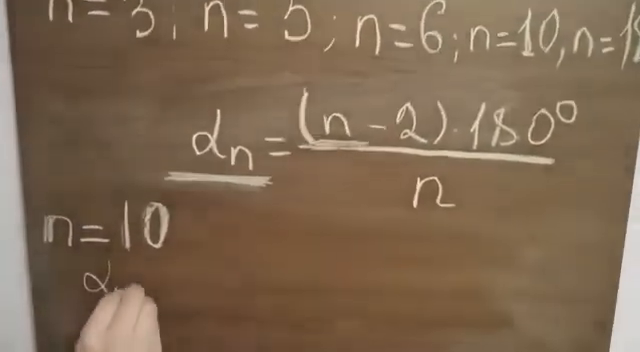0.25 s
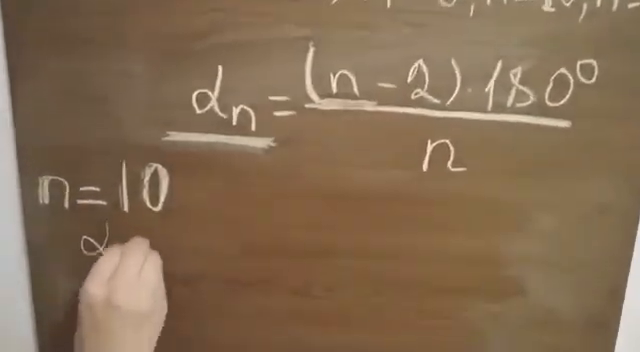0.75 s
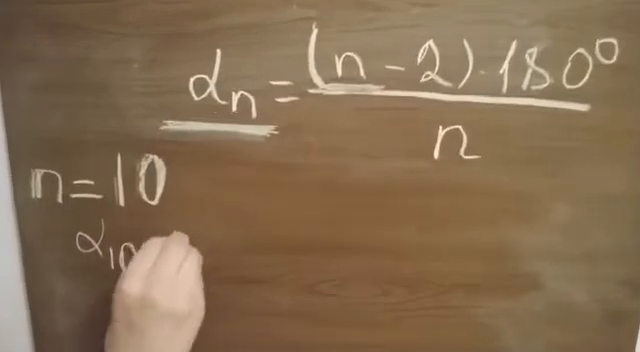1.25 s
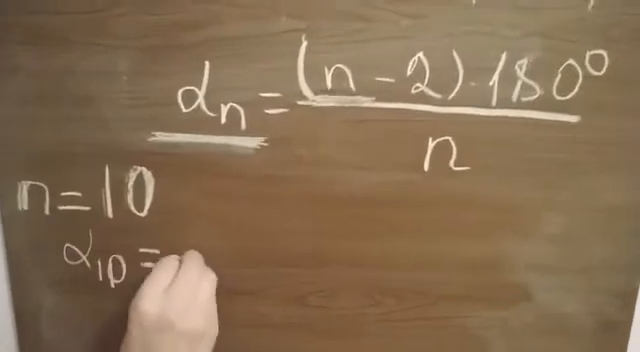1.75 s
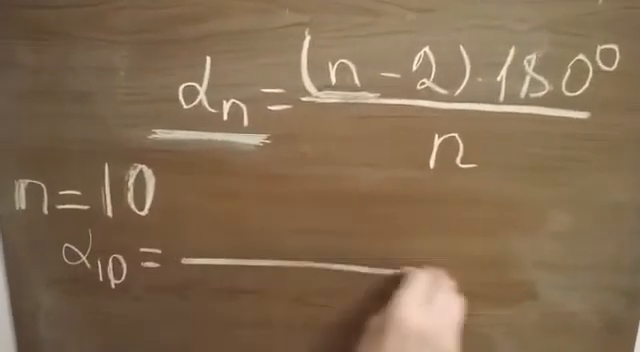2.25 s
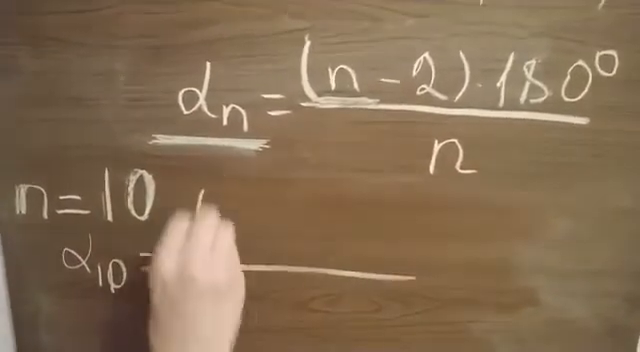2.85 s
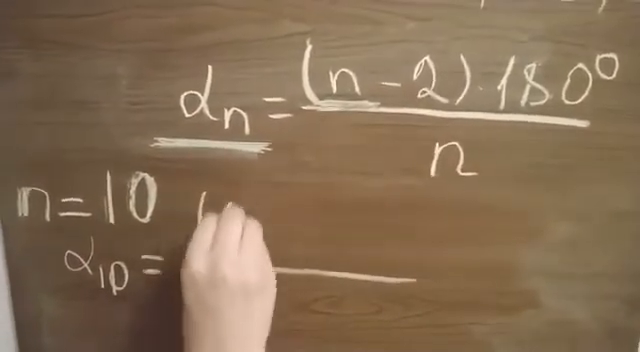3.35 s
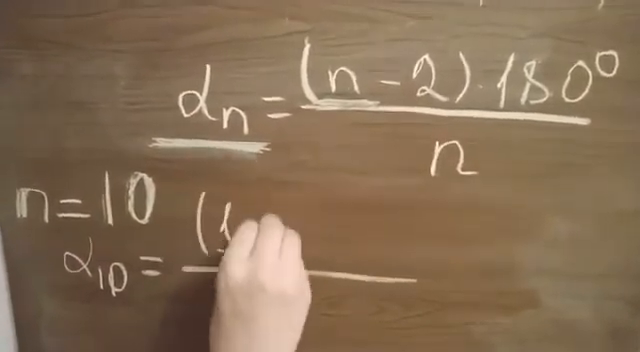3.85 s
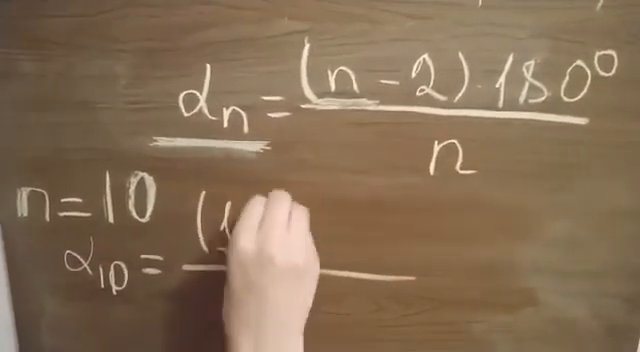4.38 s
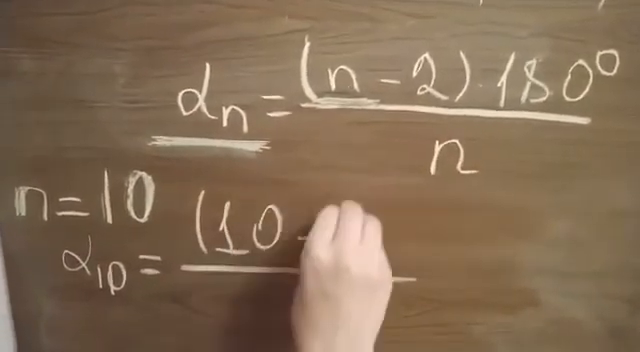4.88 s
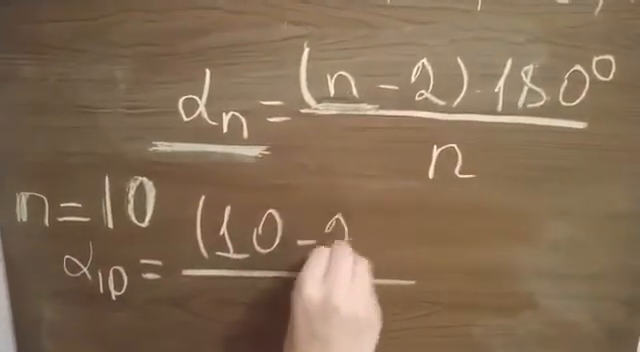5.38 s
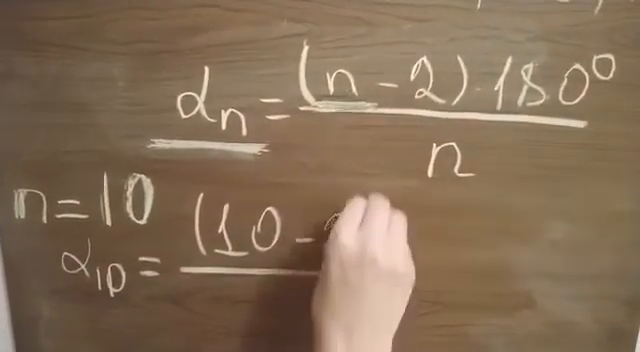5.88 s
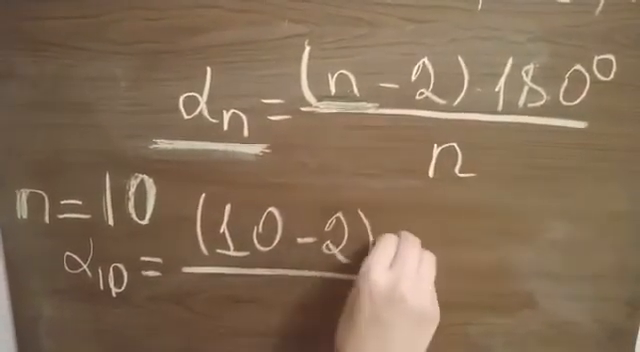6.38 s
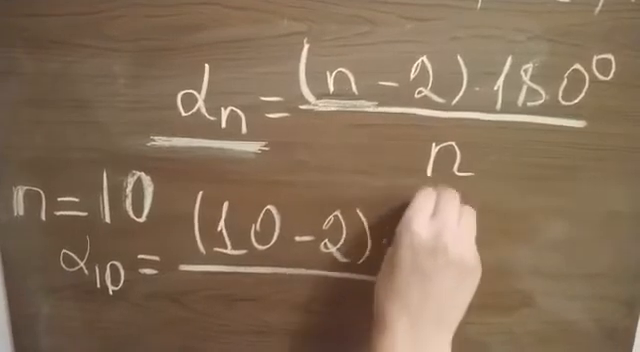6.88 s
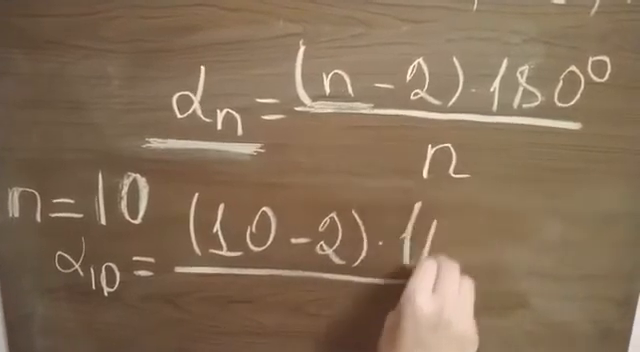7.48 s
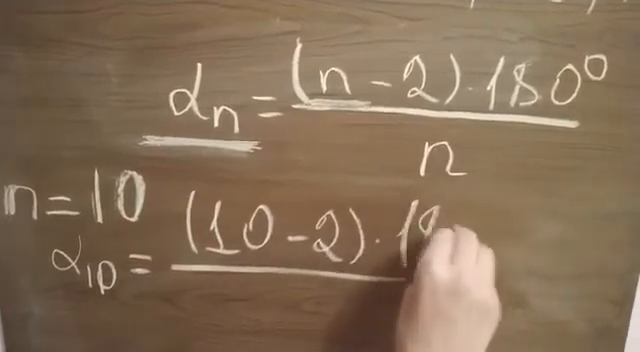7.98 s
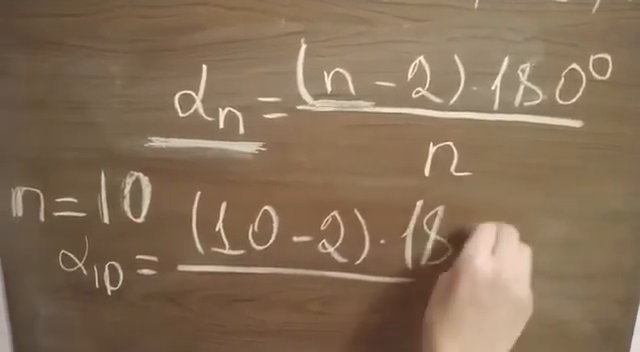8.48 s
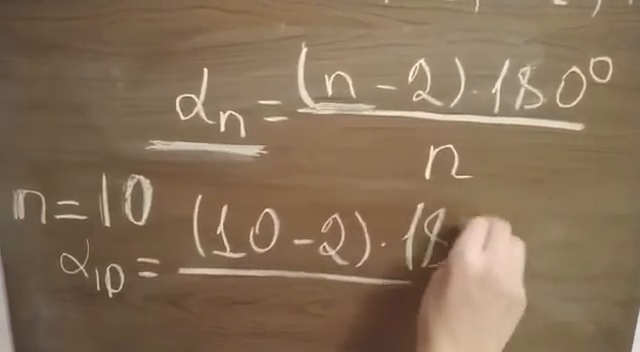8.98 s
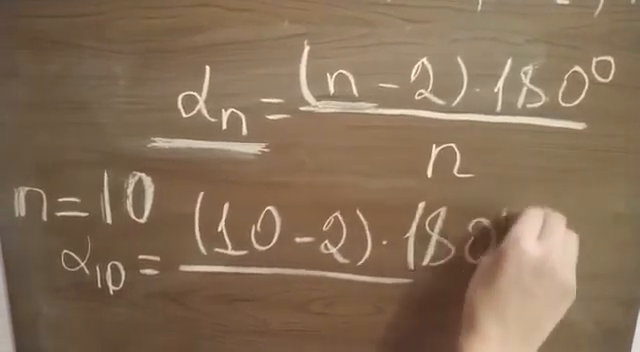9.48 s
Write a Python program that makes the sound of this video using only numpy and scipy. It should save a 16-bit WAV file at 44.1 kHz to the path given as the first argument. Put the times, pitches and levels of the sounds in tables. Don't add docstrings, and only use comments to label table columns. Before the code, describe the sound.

Chalk writes on a wooden board in a small quiet room, each stroke landing with a woody knock followed by a short dry scrape.

```python
import sys
import numpy as np
from scipy import signal
from scipy.fft import rfft, irfft, next_fast_len
from scipy.io import wavfile
from scipy.ndimage import uniform_filter1d, map_coordinates

SR = 44100
rng = np.random.default_rng(int(sys.argv[2]) if len(sys.argv) > 2 else 0)


def how_loud(loudness_db):
    steps = np.asarray(loudness_db, float) / 20
    return 10 ** steps


def waveform_to_disk(signal):
    frames = np.transpose(np.atleast_2d(signal))
    scaled = np.clip(frames, -1, 1) * 32767
    samples = np.round(scaled).astype(np.int16)
    wavfile.write(sys.argv[1], SR, samples)


N = 429093
TAIL = SR // 3


def unit(x):
    return x / np.sqrt(np.mean(x ** 2) + 1e-20)


def along(points, hz):
    f, v = np.transpose(points)
    return np.interp(np.log(hz + 1), np.log(f + 1), v)


def wobble(rate_hz):
    knots = rng.standard_normal(int(N * rate_hz / SR) + 4)
    return map_coordinates(knots, [np.arange(N) * rate_hz / SR])


def filtered(x, response):
    m = next_fast_len(x.shape[-1] + 8192)
    spectrum = rfft(x, m) * response(np.fft.rfftfreq(m, 1 / SR))
    return irfft(spectrum, m)[..., :x.shape[-1]]


def colour(points):
    return lambda hz: how_loud(along(points, hz))


def blend(pair, alike):
    turn = lambda hz: np.arccos(np.clip(along(alike, hz), -1, 1)) / 2
    mid, side = filtered(pair, lambda hz: np.array([np.cos(turn(hz)), np.sin(turn(hz))]))
    return np.array([mid + side, mid - side])


def patchy(x, depth_db):
    z = signal.stft(x, nperseg=256)[2]
    field = uniform_filter1d(rng.standard_normal(z.shape), size=4, axis=-2)
    field = uniform_filter1d(field, size=6, axis=-1)
    return signal.istft(z * how_loud(depth_db * unit(field)), nperseg=256)[1][..., :N]


def add(track, start_s, sound):
    start = round(start_s * SR)
    part = track[..., start:start + sound.shape[-1]]
    part += sound[..., :part.shape[-1]]


# delay in ms, level in dB.
WALL_ECHOES = [(4.35, 0), (6.0, -3.5), (13.6, -12), (26, -16), (39, -15)]
# frequency in Hz, T60 in s.
ROOM_T60 = [(150, 0.44), (600, 0.34), (2000, 0.54), (6000, 0.2), (14000, 0.48)]
# frequency in Hz, left-right likeness from 0 to 1.
ROOM_ALIKE = [(50, 0.18), (200, 0.98), (600, 0.66), (1200, 0.05), (2500, .02)]
# frequency in Hz, gain in dB.
RIGHT_SHADE = [(300, 0), (700, -1), (1300, -6), (2400, -9), (4400, -10), (9000, -17), (15000, -14)]
DIRECT_SHADE, ROOM_SHADE = 2.02, 1
RIGHT_LAG_SAMPLES = 4
LEAD_SAMPLES = 256


def heard(x, wet_db):
    early = np.zeros(TAIL)
    for ms, db in WALL_ECHOES:
        early[round(ms * SR / 1000)] = how_loud(db)
    early = signal.lfilter(*signal.butter(2, 1300, fs=SR), early)
    early[0] = 1

    hz, t, z = signal.stft(rng.standard_normal((2, TAIL)), SR, nperseg=256)
    decay = how_loud(-60 * t / along(ROOM_T60, hz)[:, None])
    tail = signal.istft(z * decay, SR, nperseg=256)[1][:, :TAIL]
    build_up = np.clip(np.arange(TAIL) / SR / 0.0009, 0, 1)
    tail = blend(tail, ROOM_ALIKE) * build_up
    tail = how_loud(wet_db) * tail / np.linalg.norm(tail[0])

    paths = np.pad([early, tail[1]], ((0, 0), (LEAD_SAMPLES, 0)))
    shade = lambda hz: how_loud(np.outer([DIRECT_SHADE, ROOM_SHADE], along(RIGHT_SHADE, hz)))
    right = np.roll(filtered(paths, shade).sum(axis=0), RIGHT_LAG_SAMPLES)
    left = np.pad(early + tail[0], (LEAD_SAMPLES, 0))
    return signal.fftconvolve(x[None], np.array([left, right]), axes=1)[:, LEAD_SAMPLES:]


# frequency in Hz, density in dB per Hz.
AIR_COLOUR = [(30, -60), (90, -28), (199, 2), (311, -0.5), (380, -3.5), (1200, -9), (5170, -16.5),
              (16000, -18)]
# frequency in Hz, left-right likeness from 0 to 1.
AIR_ALIKE = [(60, 0.16), (200, 0.68), (600, 0.021), (2000, 0.0075)]
# frequency in Hz, level in dB.
WHINE_HZ_DB = (3391, -79)


def hush():
    air = blend(filtered(rng.standard_normal((2, N)), colour(AIR_COLOUR)), AIR_ALIKE)
    hz, db = WHINE_HZ_DB
    phase = 2 * np.pi * hz * np.arange(N) / SR + 0.6 * wobble(9)
    whine = how_loud(db + 3 * wobble(5)) * np.sin(phase)
    return how_loud(-57 + 0.73 * wobble(2.854)) * unit(air) + whine


# start in seconds, peak in dB, pitch in Hz, left-right in dB, tick in dB.
BUMPS = [(0.436, -44.5, 452, 12, 12.5), (0.456, -46, 208, -13, -11), (0.504, -46, 467, -17, -3),
         (1.3, -51, 202, -16, -11), (1.422, -32.5, 325, 4, -11), (1.467, -40, 270, -3, -22),
         (1.68, -47, 342, 1, -20), (1.923, -37, 1100, 4, -3), (2.109, -45, 720, 3, -8),
         (2.935, -42.5, 244, -7, -24), (3.052, -54.5, 239, 17, 10), (3.294, -41.5, 377, -13, -23),
         (3.437, -46, 573, 10, 7), (3.481, -41.5, 354, -9, -21), (3.621, -50, 225, -8, -18),
         (3.651, -53, 232, 0.5, -14), (3.748, -45.5, 617, -1, -8), (5.059, -46, 316, -13, -16),
         (5.078, -41, 241, -4, 10.5), (5.479, -55.5, 248, -16, -16), (5.848, -48, 233, -11, -9),
         (8.832, -35.5, 640, 3.5, -34), (9.549, -47.5, 328, -12, -21), (9.583, -44.5, 267, -7, -17)]


def bumps():
    out, t = np.zeros((2, N)), np.arange(SR // 10) / SR
    for s, db, hz, pan_db, tick_db in BUMPS:
        life_s = 0.65 / hz
        thud = t / life_s * np.exp(1 - t / life_s) * np.sin(2 * np.pi * hz * t)
        tick = how_loud(tick_db + 2.0 - 60 * t / 0.0033) * np.sin(2 * np.pi * 950 * t)
        contact = thud + tick
        near = np.pad(contact, (0, TAIL - 1)) + how_loud(-8) * heard(contact, wet_db=5.5)
        pan = how_loud([[pan_db / 2], [-pan_db / 2]])
        add(out, s + 0.00313, how_loud(db) * pan * near)
    return signal.lfilter(*signal.butter(2, 160, "high", fs=SR), out)


# start in seconds, peak in dB.
CHIPS = [(0.354, -18), (.3566, -12), (1.074, -10), (1.0842, -32), (1.088, -10), (2.735, -13), (3.0978, -31),
         (3.1101, -35), (3.115, -14), (5.8825, -19.5), (6.3278, -13), (7.2926, -32), (8.467, -31)]
# frequency in Hz, gain in dB.
SNAP_COLOUR = [(1500, -30), (3000, -10), (5000, -2.5), (7000, -9.5), (10000, -4), (12000, -18),
               (16000, -36)]


def chips():
    dry, t = np.zeros(N), np.arange(SR // 100) / SR
    for s, db in CHIPS:
        add(dry, s, how_loud(db + 1 - 60 * t / 0.001) * rng.standard_normal(len(t)))
    return heard(filtered(dry, colour(SNAP_COLOUR)), wet_db=-10.5)[:, :N]


# centre in Hz, width in Hz, level in dB.
BOARD_MODES = [(227, 32, -21), (385, 41, -1.5), (538.4, 99, 7), (689, 135, 1), (704, 123, -18),
               (900, 96, -4), (981, 54, -5.5), (1215, 450, -9.5), (1530, 210, -8), (1990, 240, -4)]
RADIATES_HZ = 159


def board(f):
    modes = sum(how_loud(db) * 1j * f * w / (c * c - f * f + 1j * f * w) for c, w, db in BOARD_MODES)
    return modes * (1j * f / (RADIATES_HZ + 1j * f)) ** 2


# start in seconds, peak in dB, crack in dB, crumble in dB, thump in dB.
TAPS = [(0.343, -22, -14, -37, -52), (1.070, -15.5, -9, -2, -34), (1.3493, -18.5, -14, -13, -56),
        (1.7514, -18.5, -14, -46, -59), (2.7308, -15.5, -10.5, -14, -44), (3.0946, -13, -12.5, -4.5, -62),
        (4.0088, -16, -16, -12, -40), (4.671, -15.5, -13.5, -44, -56), (4.922, -16.5, -20.5, -53, -83),
        (5.8791, -17, -13.5, -19, -57), (6.3242, -14, -15.5, -8.5, -50), (6.7172, -17, -18, -25, -62),
        (7.2891, -19.5, -12, -12, -55), (8.463, -16.5, -9.5, -5, -42), (9.2323, -23, -6.5, -5.5, -56)]
# frequency in Hz, gain in dB.
CRACK_COLOUR = [(700, -30), (1300, -7.5), (1700, 0), (2500, 0.5), (3300, -5), (5000, -8.5), (10000, -36),
                (16000, -98)]
GRIND_S = 0.0029


def taps():
    out, t = np.zeros((2, N)), np.arange(SR // 8) / SR
    push = -np.sin(np.pi * np.clip(t / 0.00075, 0, 1)) ** 2
    boom = filtered(push, board)
    boom = boom / np.abs(boom).max()
    thump = np.sin(np.pi * np.clip(t / 0.017, 0, 1)) ** 2
    late = np.clip(t - 0.0005, 0, None)
    click = filtered(np.diff(1.0 * (late > 0), prepend=0), colour(CRACK_COLOUR))
    click = click / np.abs(click).max()
    for s, db, crack_db, crumble_db, thump_db in TAPS:
        noise = rng.standard_normal((2, len(t))) * (late > 0)
        splinter = 0.35 * how_loud(-60 * np.clip(late - GRIND_S, 0, None) / 0.014) * noise[0]
        crack = how_loud(crack_db + 13) * (0.2 * click + filtered(splinter, colour(CRACK_COLOUR)))
        crumble = filtered(how_loud(-60 * late / 0.034) * noise[1], colour(SNAP_COLOUR))
        knock = boom + crack + how_loud(crumble_db - 2.5) * crumble + how_loud(thump_db - 5) * thump
        add(out, s - 0.0003, how_loud(db + 2.5) * heard(knock, wet_db=-2.5))
    return out


# start in seconds, length in seconds,
# scrape at top speed in dB, pressure into the board in dB, coarseness in dB.
FIRST_STROKES = [(0.33, 0.22, -57.2, 4.5, -0.5), (1.043, 0.21, -55, 3, 2), (1.345, 0.17, -56, 6.5, -1),
                 (1.821, 0.39, -47, -1, -5), (2.747, 0.22, -47.0, 2.5, -2), (3.072, 0.2, -50, 0.5, 1.5),
                 (3.99, 0.29, -54, -7, -0.5), (4.654, 0.13, -52.5, -17, 1), (4.928, 0.13, -55.5, 0, 0),
                 (5.881, 0.276, -50, 3, 0), (6.3, 0.15, -63, -4, 5), (6.703, 0.18, -46.5, -1, 2),
                 (7.303, 0.21, -48, 5, -2.5), (8.463, 0.24, -51.0, 0.5, 0), (9.203, 0.055, -59, 24.5, -4)]
NEXT_STROKES = [(0.561, 0.22, -52.5, -4.5, 3), (0.77, 0.12, -61.5, 7.5, 2), (2.09, 0.22, -47, -1, -6),
                (3.29, 0.19, -51.5, 6, -3), (3.481, 0.11, -55, 0, -3), (3.623, 0.15, -52.2, -3.5, -2),
                (4.192, 0.21, -47, -2.5, -1), (4.389, 0.15, -52.5, 5, -3), (5.062, 0.13, -52, -7, 2),
                (5.157, 0.37, -51.5, 3.5, -2), (5.508, 0.188, -53, 4, -0.5), (6.887, 0.2, -46, 4, -5),
                (7.523, 0.24, -46, -5, -1), (7.731, 0.316, -53, 2.5, -3.5), (7.956, 0.32, -52.5, 0.5, -2.5),
                (8.676, 0.26, -45.1, -3, -2.5), (8.88, 0.19, -56, 4.5, -3), (9.242, 0.5, -52.5, -3.5, -0.5),
                (9.625, 0.058, -49, -4.5, -5)]
HISS_GROWS, DUST_GROWS, RASP_GROWS, DRAG_GROWS = 1, 1, 0.86, 0.78
DUST_DB, RASP_DB, DRAG_DB = -16, -7.5, -8
DUST_THINS = 0.3


def strokes():
    power = np.zeros((4, N))
    grows = np.array([[HISS_GROWS], [DUST_GROWS], [RASP_GROWS], [DRAG_GROWS]])
    landings = [tap[0] for tap in TAPS] + [0] * len(NEXT_STROKES)
    for (s, length_s, db, press_db, coarse_db), landing in zip(FIRST_STROKES + NEXT_STROKES, landings):
        t = np.arange(round(length_s * SR)) / SR
        speed = np.sin(np.pi * t / length_s) * (s + t > landing)
        layers_db = [[0], [DUST_DB - DUST_THINS * coarse_db], [RASP_DB + coarse_db], [DRAG_DB + press_db]]
        add(power, s, (how_loud(db) * how_loud(layers_db) * speed ** grows) ** 2)
    return np.sqrt(power)


# frequency in Hz, gain in dB.
HISS_COLOUR = [(3000, -44.5), (6000, -8.5), (8000, -3.5), (10200, 4), (11500, -4), (13000, -4),
               (16000, -8.5)]
# frequency in Hz, gain in dB.
DUST_COLOUR = [(9000, -21), (12000, 8.5), (13500, -47.5), (16000, -4)]
# frequency in Hz, gain in dB.
RASP_COLOUR = [(800, -34), (1500, -1.5), (2500, 1), (3500, -1), (4800, 3.5), (6000, -2.5), (9000, -36)]
# frequency in Hz, gain in dB.
DRAG_COLOUR = [(150, -21), (400, -3.5), (550, -1.5), (730, 2), (1050, 4.5), (1250, 1.5), (2500, -7),
               (4000, -7.5)]


def scrape():
    grains = patchy(rng.standard_normal((4, N)) * how_loud(2.7 * rng.standard_normal(N)), depth_db=2.5)
    flutter = how_loud(2.0 * wobble(200) + 0.39 * wobble(45))
    hiss = unit(filtered(grains[0] * flutter, colour(HISS_COLOUR)))
    dust = unit(filtered(grains[1] * flutter, colour(DUST_COLOUR)))
    rasp = unit(filtered(grains[2] * flutter, colour(RASP_COLOUR)))
    grip = how_loud(1.93 * wobble(60) + 1.7 * wobble(16))
    drag = unit(filtered(grains[3] * grip, lambda hz: board(hz) * colour(DRAG_COLOUR)(hz)))
    dry = how_loud(1.5) * np.sum(strokes() * [hiss, dust, rasp, drag], axis=0)
    out = np.zeros((2, N))
    for start in range(0, N, SR // 2):
        add(out, start / SR, heard(dry[start:start + SR // 2], wet_db=0.5))
    return out


def scene():
    return hush() + bumps() + chips() + taps() + scrape()


def roll_off(x):
    return signal.sosfilt(signal.butter(12, 16630, fs=SR, output="sos"), x)


def record(dry):
    mix = filtered(dry, lambda hz: hz < 15740)
    return roll_off(mix)


dry = scene()
out = record(dry)
waveform_to_disk(out)
```